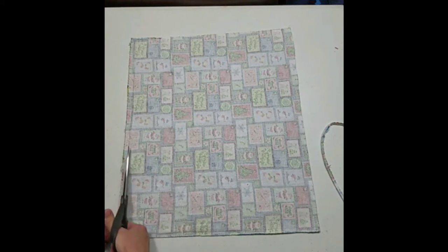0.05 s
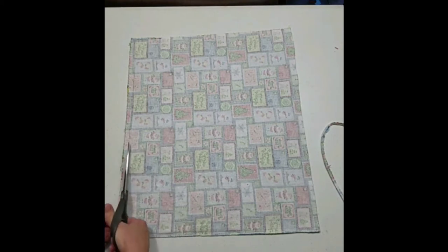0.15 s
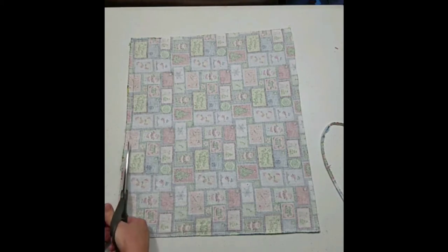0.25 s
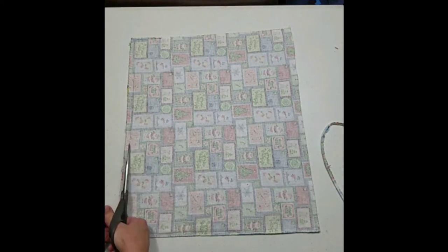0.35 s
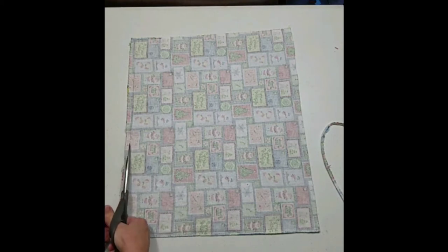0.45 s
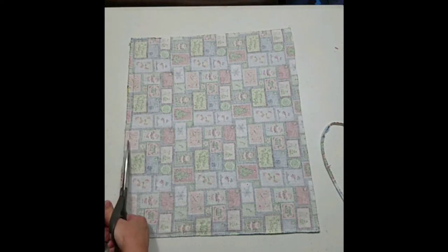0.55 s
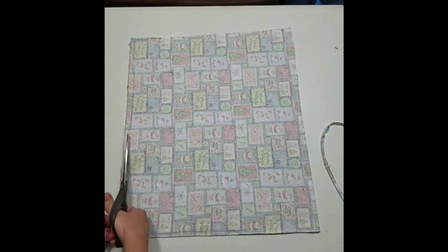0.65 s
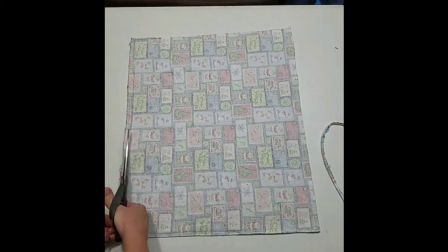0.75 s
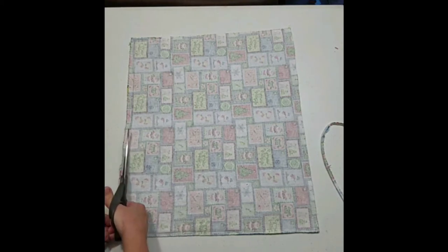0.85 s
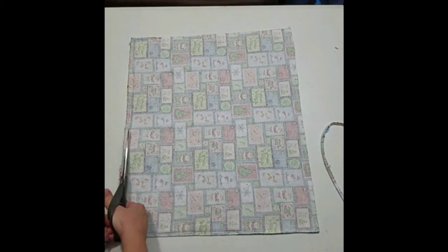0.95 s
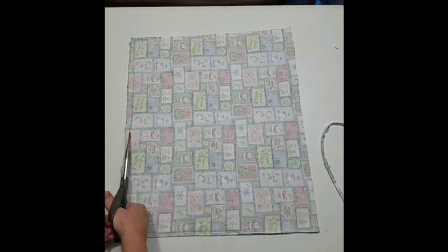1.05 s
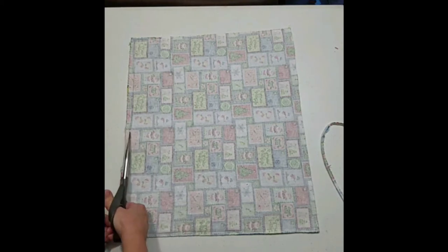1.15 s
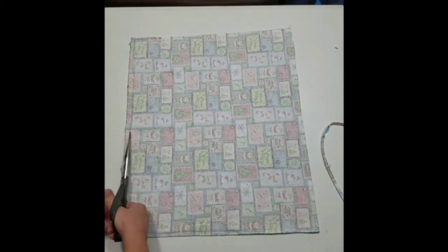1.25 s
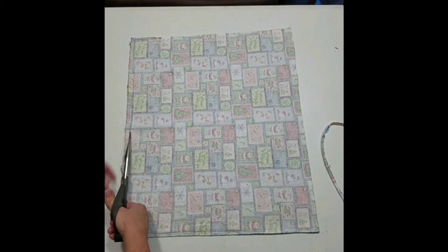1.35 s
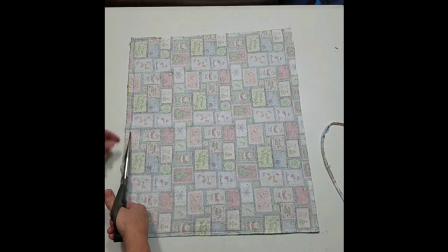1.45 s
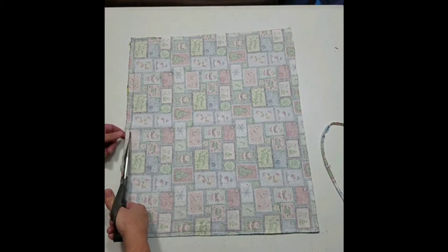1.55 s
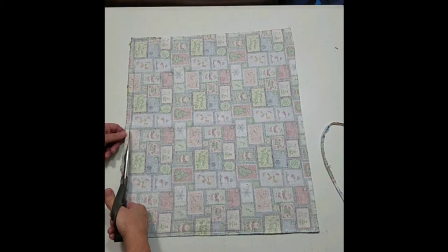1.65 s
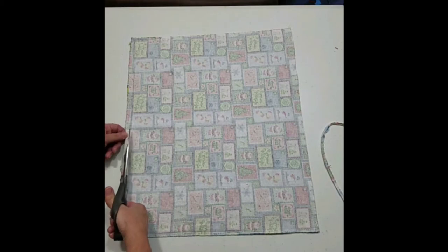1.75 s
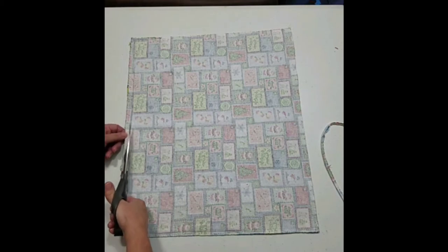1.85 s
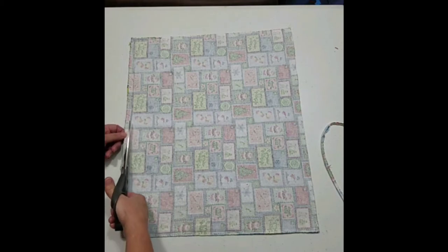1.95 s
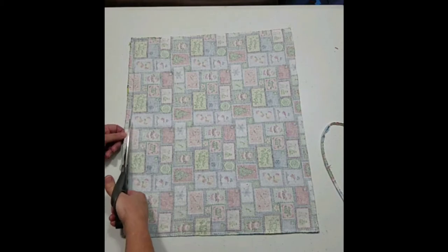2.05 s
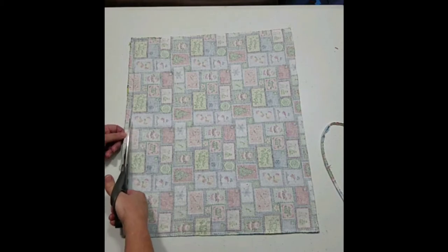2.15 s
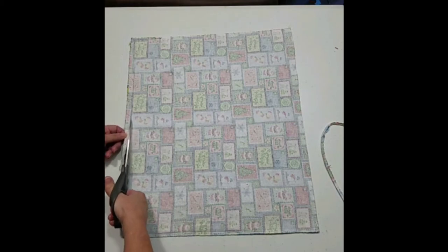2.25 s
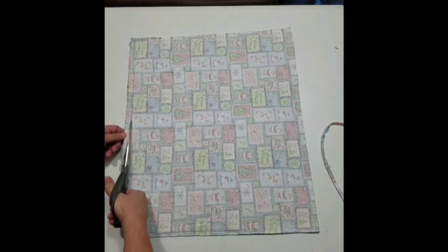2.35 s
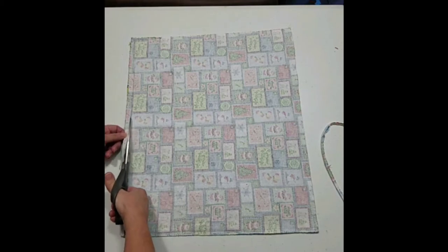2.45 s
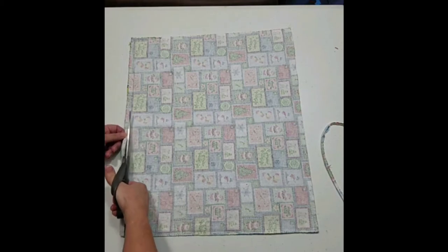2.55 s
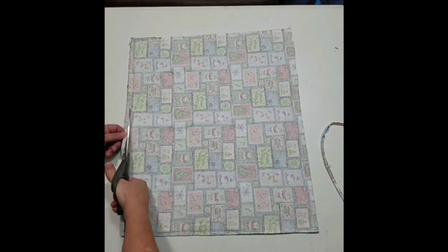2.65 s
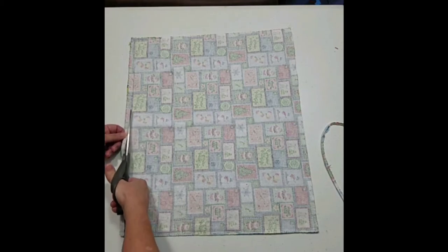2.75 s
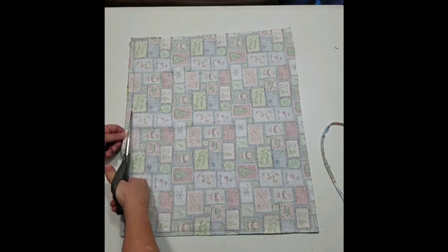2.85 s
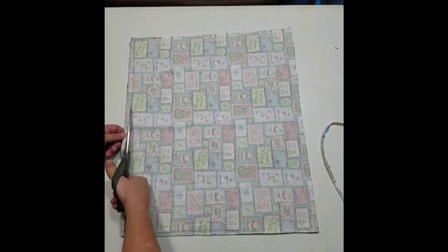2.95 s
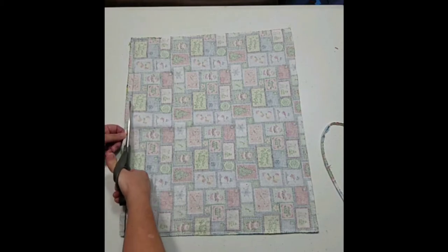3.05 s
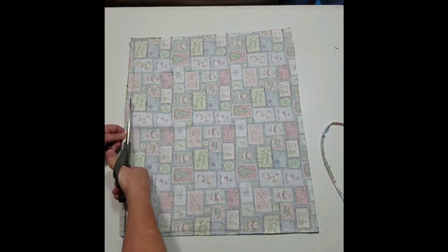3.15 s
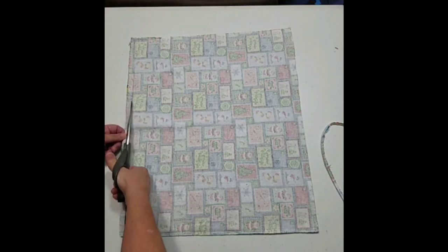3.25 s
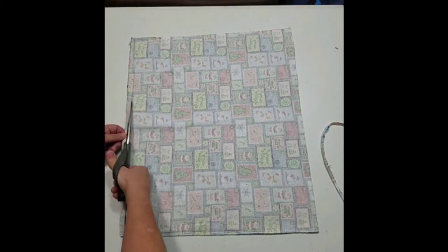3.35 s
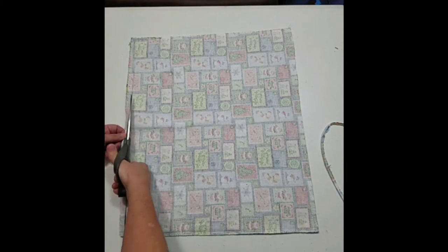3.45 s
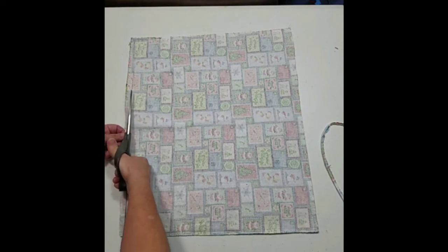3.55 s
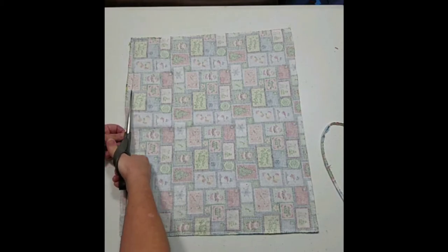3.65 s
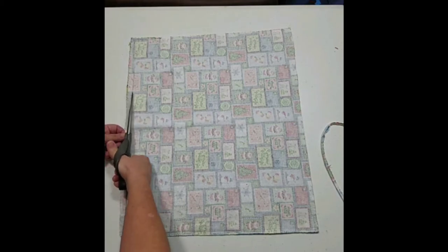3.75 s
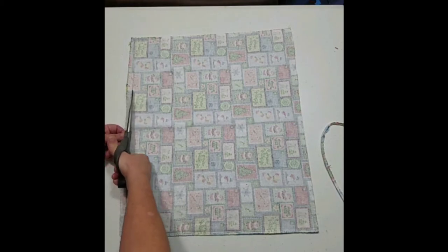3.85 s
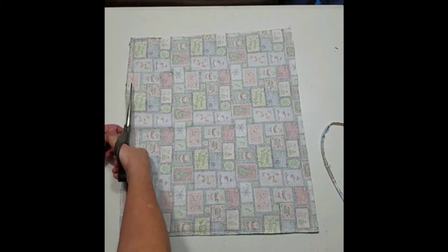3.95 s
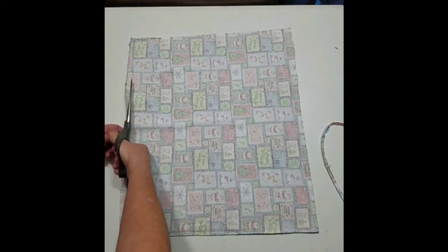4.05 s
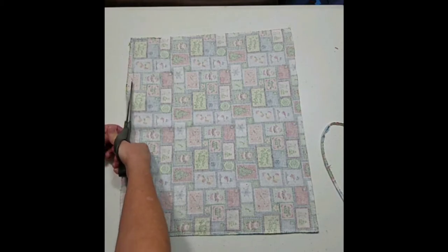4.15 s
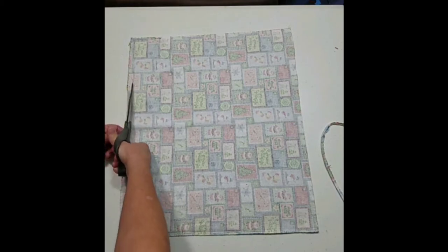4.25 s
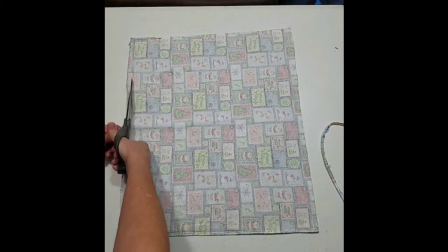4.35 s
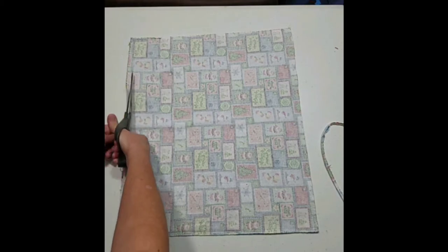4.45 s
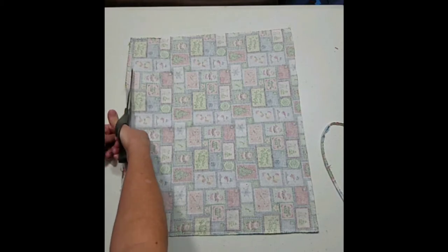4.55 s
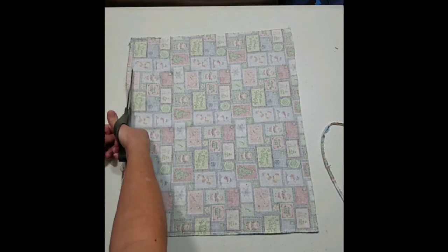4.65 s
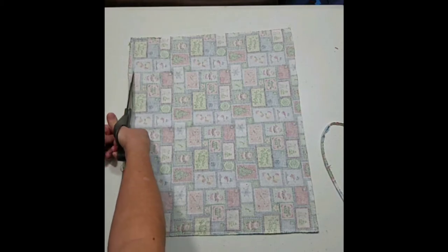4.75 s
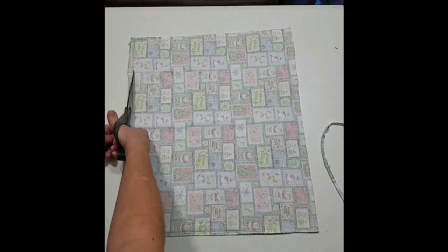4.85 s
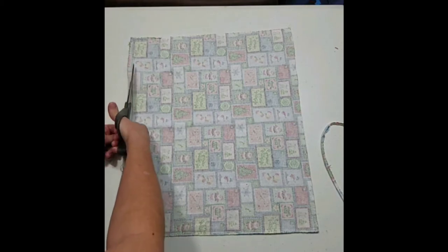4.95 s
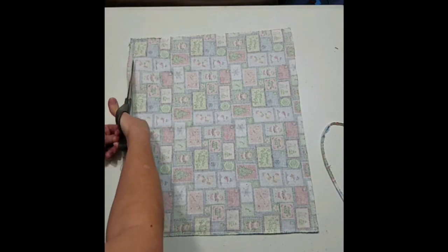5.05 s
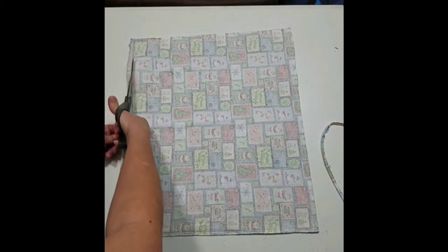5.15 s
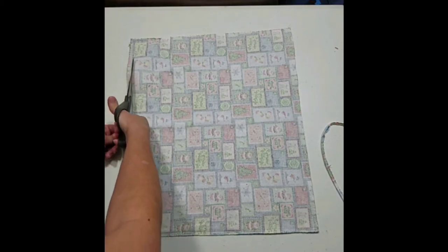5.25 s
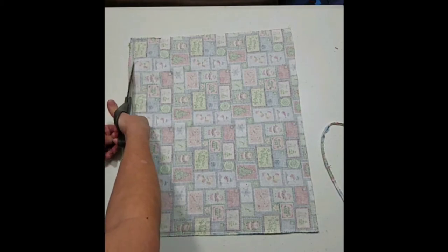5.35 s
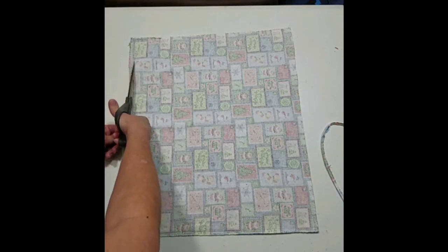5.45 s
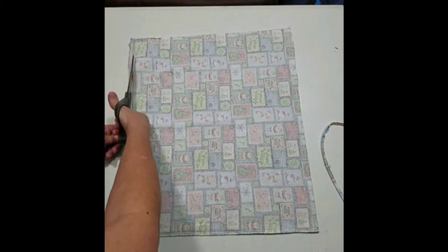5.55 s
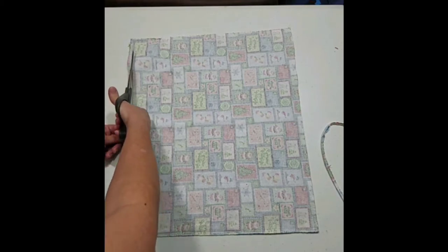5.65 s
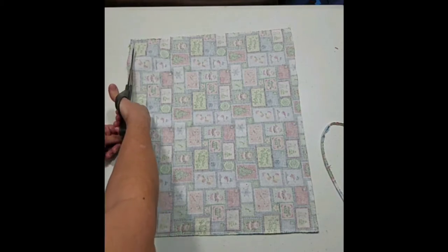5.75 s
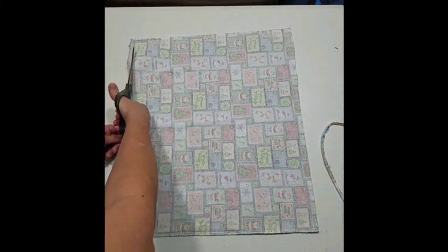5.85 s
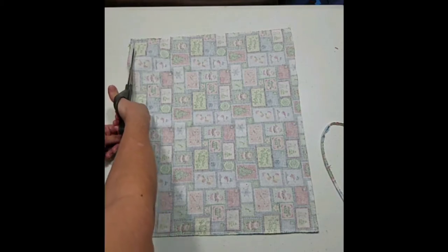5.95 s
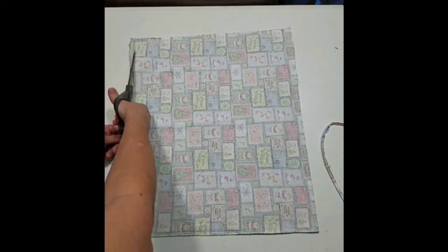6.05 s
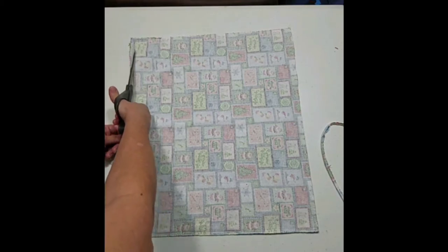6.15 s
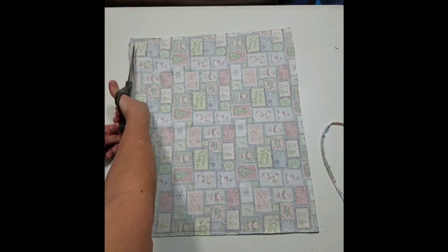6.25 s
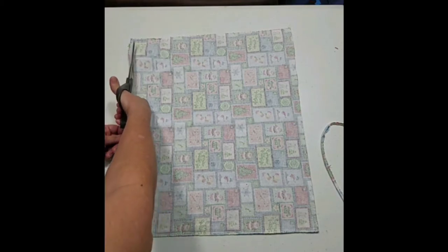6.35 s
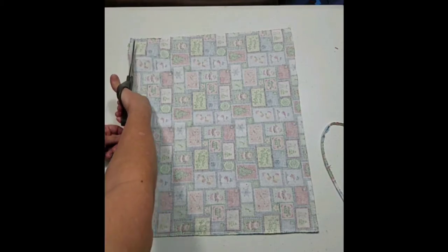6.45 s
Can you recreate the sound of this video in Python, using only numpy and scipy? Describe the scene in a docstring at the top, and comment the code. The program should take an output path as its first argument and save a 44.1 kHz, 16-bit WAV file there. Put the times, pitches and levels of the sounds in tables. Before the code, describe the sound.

In a small, quiet room, heavy fabric scissors work along cotton on a resonant table, heard close in stereo. Faint air and a light scrape with a soft rub open the scene. Crunchy cuts of about a tenth of a second start near 0.45 and 1.06 s, with a barely audible thin pivot squeak around 0.7-0.9 and a firm knock at 1.1. A pause holds only weak sliding until about 2.35, when a cut lands with the strongest knock. Cuts follow near 2.9, 3.3, 3.8, 4.3, 4.8, 5.4 and 6.1. Each is a grainy, bright hiss of snapping threads, its steel ring falling from pivot to tip, with woody drumming and low boom underneath. Between them the blades reopen and rub forward in soft swells. A dull knock comes near 6.2, then a last faint slide.

```python
"""In a small room, dressmaker's scissors make ten cuts along a piece of cotton lying on a table.
In each cut threads snap between the blades (crackling noise through spectra and gliding resonances),
whose ring drops as the crossing point runs from pivot to tip; the lower blade makes the table drum along.
Between cuts the scissors reopen and slide forward as swells of friction noise; knocks and legs are pulses.
A thin pivot squeak, a short room tail and faint steady air complete the scene."""
import sys
import numpy as np
from scipy import signal
from scipy.fft import rfft, irfft
from scipy.io import wavfile
from scipy.ndimage import uniform_filter1d

SR = 44100
rng = np.random.default_rng(int(sys.argv[2]) if len(sys.argv) > 2 else 0)


def wav_out(sig):
    """Save sig, one row per channel (or a flat mono array), as 16-bit PCM at SR to the path in sys.argv[1]."""
    wavfile.write(sys.argv[1], SR, np.round(np.clip(np.atleast_2d(sig).T, -1, 1) * 32767).astype(np.int16))


N = 286650
TAPS = 16384  # length of every body response, in samples
FILTER_HZ = np.fft.rfftfreq(TAPS, 1 / SR)

# Level columns in the event tables are relative: each layer adds its own trim.
# One row a cut: touch_s, wait_s until full grip, stroke_s, shear_db, drum_db, scrape_db, weight_db,
# light_db (touch against full grip), change_db over the stroke, bite_db and snap_db in the table, rock_db,
# pivot_hz, pivot_db and tip_hz, tip_db (blade ring against the shearing), spot_hz (table's ring at this spot)
STROKES = [(.441, 0.0055, 0.12, -52.5, -34, -42.5, -38.5, -3, -5.5, -29, -26.5, -47, 8600, 0.5, 4560, -2.5, 895),
           (1.061, 0.0411, .095, -49.5, -35, -38, -38.5, -4.5, -5.5, -23, -32, -38.5, 8370, -4, 4400, -10.5, 1150),
           (2.354, 0.024, 0.08, -49.5, -31.5, -37, -36, -2, 14, -38, -21, -35, 8700, -5, 4170, -10, 520),
           (2.860, 0.027, 0.081, -49.5, -36, -41.5, -34, -8, -4, -34.5, -32.5, -31, 7660, -9.5, 4300, -9, 524),
           (3.322, .012, 0.074, -51, -37.5, -39.5, -35.5, -9, 10, -31, -29, -31.5, 8140, 6, 4550, -4, 1065),
           (3.767, 0.03, 0.096, -50.5, -38, -40.5, -42, -8, -3, -31.5, -29, -44, 8170, -0.5, 4580, -4, 970),
           (4.262, 0.0053, 0.11, -51, -35.5, -44.5, -40.5, -6, 1, -47, -56, -33, 8000, 1, 4480, -4.5, 890),
           (4.786, 0.0046, 0.11, -49, -36, -42, -34.5, 2.5, 9, -56, -33, -35, 7920, 0.5, 4570, -5, 820),
           (5.395, 0.033, 0.099, -52, -38, -47.5, -36.5, -13.5, -12, -29, -24, -40, 8100, -12, 4500, -2, 626),
           (6.064, 0.032, 0.099, -52.5, -34.5, -44.5, -39, -5, -2.5, -29.5, -23, -38, 7780, -3.5, 4900, -2, 594)]
# The table top's resonances: pitch_hz, width_hz, height_db
TABLE_PEAKS = [(282.3, 73, 6.2), (318.5, 12.6, 2.4), (402.2, 17, 6.7), (533, 22, 1.8), (622, 110, 3.5),
               (770.5, 27, 8.2), (1073, 19, 10.2), (1370, 25, 3), (1310, 12, 1)]
# Spectrum of the table scraped by the lower blade: pitch_hz, density_db (per Hz)
SCRAPED_TABLE = [(250, -18), (500, -2), (750, 0), (1100, -3), (1500, -8), (2200, -15), (4000, -29),
                 (9000, -35), (15000, -42)]


def cutting(shear_db, drum_db, scrape_db, weight_db):
    """The same uneven force rings the blades and drums, scrapes and booms the table under them."""
    # spectrum of the drummed table: pitch_hz, density_db (per Hz)
    drummed_table = [(60, -12), (150, -22.5), (240, -6), (320, 0), (430, 1), (520, -7.5), (700, -11.5),
                     (1100, -20.5), (4000, -69)]
    bite_s, snap_s, snap_lead_s = 0.023, 0.012, 0.012  # the snap starts just before the tips meet
    bite_in_steel_db, snap_in_steel_db = -4, 3.5  # against the shearing
    steel_lag_s = 0.0018  # the first touch reaches the table before the blades
    touch_rise_db = 9  # the touch firms up on the way to the full grip
    release_s = 0.023  # the squeeze dies away as the tips meet

    t, cuts = np.arange(N) / SR, np.transpose(STROKES)
    # each sample reads its own cut's row, switching 0.1 s ahead of the touch
    current = np.searchsorted(cuts[0, 1:] - .1, t)
    touch, wait, stroke, shear, drum, scrape, weight, light, change, bite, snap, _, *rings, spot_hz = cuts[:, current]
    grip = touch + wait
    closed = grip + stroke
    travel = (t - grip) / stroke
    done = np.clip(travel, 0, 1)

    # a light first touch, then the full squeeze, strongest in mid-stroke before the cut's own tilt
    firm = step((t - grip) / .003)
    creep = amp(light + touch_rise_db * (np.clip((t - touch) / wait, 0, 1) - .5))
    gripped = creep * step((t - touch) / .003) * (1 - firm) + firm
    arch = .72 + .35 * np.sin(np.pi * done)
    squeeze = gripped * step((closed - t) / release_s) * arch * amp(change * (done - .5))
    # the hand's weight builds through the stroke and leaves the table after it
    lean = gripped * (1.65 + .5 * done) * np.exp(-np.maximum(t - closed, 0) / 0.01)

    # the blades bite into the cloth, and snap through the last threads
    biting = surge(t - grip, bite_s)
    snapping = surge(t - closed + snap_lead_s, snap_s)
    blade_bite = np.hypot(amp(bite_in_steel_db) * biting, amp(snap_in_steel_db) * snapping)
    table_bite = np.hypot(amp(bite) * biting, amp(snap) * snapping)
    threads = weave(threads_per_s=410, uneven=.35, depth=0.22) * lumps(depth_db=2.5, size=400)

    blade_start = step((t - touch) / steel_lag_s - 1)
    blade_force = amp(shear + shear_db) * blade_start * np.hypot(squeeze, blade_bite) * threads
    steel = ringing_on(blades(blade_force, travel, *rings))

    tugs = crackle(per_s=1200, spread_db=3.0, smooth=0.22) * threads
    drum_force = amp(drum_db) * np.hypot(amp(drum) * (squeeze + 0.031 * lean), table_bite)
    wood = through(tugs * drum_force, body(drummed_table, TABLE_PEAKS))

    rasp = crackle(per_s=1200, spread_db=-3.5, smooth=1.0) * threads
    rasp = rasp * amp(scrape_db) * np.hypot(amp(scrape) * squeeze, 0.077 * table_bite)
    grind = amp(-1.5) * through(rasp, body(SCRAPED_TABLE, TABLE_PEAKS))
    spot = amp(-4.5) * resonate(rasp, spot_hz, width=280)  # the table's ring under the blade
    return steel + wood + grind + spot + table_boom(tugs * amp(weight + weight_db) * lean)


def blades(force, travel, pivot_hz, pivot_db, tip_hz, tip_db):
    """Snapping threads hiss and ring the steel in spurts: high near the pivot, lower towards the tips."""
    # spectrum of the shearing hiss: pitch_hz, density_db (per Hz)
    shearing = [(600, 17.5), (1500, -29), (2200, 2.5), (3200, 0), (4500, 2), (5900, 0.5), (7500, 1.5),
                (10500, 2.5), (13000, 1.5), (14700, -2)]
    near_pivot = step((.42 - travel) / .25)
    near_tip = step((travel - .58) / .35)
    snaps = force * crackle(per_s=8000, spread_db=-4, smooth=0.5)
    # the hiss yields a little where the ring takes over
    hiss_force = snaps * (1 - .3 * near_pivot) * (1 - .35 * near_tip)
    hiss = shifting(through(hiss_force, body(shearing)), patchy_db=4)
    heel = snaps * near_pivot * amp(pivot_db - 3.5) * lumps(depth_db=4, size=350)
    tips = snaps * near_tip * amp(tip_db - 1.5) * lumps(depth_db=4, size=350)
    # each end rings at its pitch and at a fainter overtone
    heel_ring = resonate(heel, pivot_hz, width=1500) + amp(-10) * resonate(heel, 1.5 * pivot_hz, width=1400)
    tip_ring = resonate(tips, tip_hz, width=1300) + amp(-10) * resonate(tips, 1.9 * tip_hz, width=1400)
    return hiss + heel_ring + tip_ring


def ringing_on(steel):
    """The blades' own modes ring on briefly after the threads."""
    # the steel's modes: pitch_hz, width_hz, level_db
    steel_modes = [(4050, 17, 6), (4450, 36, 0), (4900, 89, -2), (7700, 37, 1.5), (7800, 80, -11),
                   (8500, 54, -7.5), (9100, 67, -8), (13600, 40, 16), (14434, 40, 14)]
    return steel + amp(-12.5) * through(steel, ring(steel_modes))


def weave(threads_per_s, uneven, depth):
    """The force pulses at a wandering rate as the edge meets one thread after another."""
    wander = evened(uniform_filter1d(rng.standard_normal(N), size=300))
    speed = threads_per_s * np.exp(uneven * wander)
    return evened(np.exp(depth * np.cos(2 * np.pi * np.cumsum(speed) / SR)))


def shifting(x, patchy_db):
    """The hiss has an uneven, shifting grain: random level patches over time and pitch."""
    z = signal.stft(x, nperseg=256)[2]
    patches = uniform_filter1d(rng.standard_normal(z.shape), size=5, axis=0)
    patches = evened(uniform_filter1d(patches, size=5, axis=1))
    return signal.istft(z * amp(patchy_db * patches), nperseg=256)[1][:N]


def surge(t, length_s):
    """A quick rise of force at t = 0 that lasts for a few threads."""
    t = np.maximum(t, 0)
    return (1 - np.exp(-t / .002)) * np.exp(-(t / length_s) ** 2)


def table_boom(drive):
    """The hand's weight stirs the low modes, which change in level as the scissors move up the table."""
    # the table's low modes: pitch_hz, width_hz, halfway_db, change_db_per_s
    low_modes = [(58.3, 12, -16, -1), (120.9, 15.5, -14, -3.5), (142.1, 19.8, -1, -1.2),
                 (168.6, 17.7, -1.5, 1.15), (228, 28.4, -11, 1.5)]
    from_halfway_s = (np.arange(N) - N / 2) / SR
    boom = np.zeros(N)
    for hz, width, db, change in low_modes:
        boom += through(drive * amp(db + change * from_halfway_s), ring([(hz, width, 0)]))
    return boom / np.linalg.norm([amp(db) for _, _, db, _ in low_modes])


def rocking(level_db):
    """The settling hand and the end of each stroke rock the table on its legs."""
    settle = (0, -35.5)  # start_s, level_db: the hand settles before the first cut
    rock_lead_s = 0.011  # the table starts to rock this long before the blades close
    touch, wait, stroke, rock_db = np.transpose(STROKES)[[0, 1, 2, 11]]
    return blows([settle, *zip(touch + wait + stroke - rock_lead_s, rock_db)], legs(), level_db)


def legs():
    """The table's leg mode swells and dies after a push."""
    mode_hz, swell_s = 60.1, 0.029
    t = np.arange(TAPS) / SR
    return t / swell_s * np.exp(1 - t / swell_s) * np.sin(2 * np.pi * mode_hz * t)


def sliding(rub_db, scrape_db, weight_db):
    """A short scrape as the pivot turns, then a swell as the lower blade rubs over the table."""
    # reopenings and slides: opens_s, pivot_db, middle_s, half_length_s, rubbing_db, weight_db
    advances = [(0.072, -51.5, .205, 0.067, -44, -55), (0.67, -49.5, .82, 0.057, -44, -54.5),
                (1.382, -77, 1.78, 0.053, -56, -77), (1.957, -64, 2.07, 0.056, -53, -57),
                (2.577, -54.5, 2.67, 0.033, -51, -54), (3.074, -52.5, 3.18, 0.045, -44.5, -52.5),
                (3.526, -54, 3.655, 0.052, -47, -53), (3.995, -52.5, 4.09, 0.045, -47, -54),
                (4.468, -53.5, 4.59, 0.06, -42.5, -47.5), (5.002, -52.5, 5.145, 0.052, -42, -50),
                (5.62, -57, 5.76, 0.067, -47, -52.5), (6.336, -55.5, 6.46, 0.095, -56, -64)]
    # spectrum of the rubbed table: pitch_hz, density_db (per Hz)
    rubbed_table = [(60, -22), (140, -12), (220, -1), (320, 0), (430, -6), (600, -16), (1100, -29),
                    (4000, -48), (15000, -58)]
    open_rise_s, open_fall_s = 0.012, 0.038  # the pivot's scrape swells and fades
    open_rub_db, open_weight_db = 5.5, -4.5  # table drive against pivot drive, before the layer trims
    slide_scrape_db = -13.5  # blade scrape against rubbing drive, before the layer trims
    weight_lag_s = 0.011  # the weight follows the slide

    t, power = np.arange(N) / SR, np.zeros((3, N))  # power of rubbing, scraping and weight
    for opens, pivot, middle, half, rubbing, pressing in advances:
        near = (t > opens - 10 * open_rise_s) & (t < middle + 5 * half)
        turn = amp(pivot) * swell(t[near] - opens, open_rise_s, open_fall_s)
        slide = amp(rubbing) * swell(t[near] - middle, half, half)
        press = amp(pressing) * swell(t[near] - middle - weight_lag_s, half, half)
        power[:, near] += np.square([amp(open_rub_db) * turn, turn, amp(open_weight_db) * turn])
        power[:, near] += np.square([slide, amp(slide_scrape_db) * slide, press])
    rub_force, scrape_force, weight_force = np.sqrt(power)

    slips = crackle(per_s=310, spread_db=0.5, smooth=0.86) * lumps(depth_db=4.5, size=900)
    grains = crackle(per_s=1400, spread_db=-1, smooth=0.96)
    rubs = amp(rub_db) * through(slips * rub_force, body(rubbed_table, TABLE_PEAKS))
    scrapes = amp(scrape_db) * through(grains * scrape_force, body(SCRAPED_TABLE, TABLE_PEAKS))
    return rubs + scrapes + amp(weight_db) * table_boom(slips * weight_force)


def swell(t, rise_s, fall_s):
    """A smooth hump with its top at t = 0."""
    return np.exp(-(t / np.where(t < 0, rise_s, fall_s)) ** 2 / 2)


def knocking(level_db):
    """The scissors knock on the table: single pushes into its resonant body."""
    # the knocks: start_s, level_db
    knocks = [(.511, -26), (.753, -30), (1.123, -14.5), (2.071, -33), (2.21, -63), (2.434, -10.5),
              (2.957, -35), (3.768, -29), (4.871, -25.5), (5.394, -31), (6.173, -20.5)]
    # spectrum of the knocked table: pitch_hz, density_db (per Hz)
    knocked_table = [(50, -13), (140, 10.5), (330, 1.5), (550, 1), (1100, -26), (2000, -29), (4500, -36),
                     (7000, -40), (15000, -46)]
    return blows(knocks, body(knocked_table, TABLE_PEAKS), level_db)


def squeak(width):
    """A thin, fuzzy whistle from the dry pivot: lumpy noise in a gliding resonance."""
    # breakpoints of the squeak: time_s, pitch_hz, level_db
    whistle = [(.67, 12200, -85), (.75, 13200, -85), (.82, 12700, -84), (.88, 12200, -91)]
    t, (s, hz, db) = np.arange(N) / SR, np.transpose(whistle)
    level = np.interp(t, s, amp(db), left=0, right=0)
    friction = rng.standard_normal(N) * lumps(depth_db=-6, size=600)
    return resonate(friction * level, np.interp(t, s, hz), width)


def phase_scattered(x, scatter):
    """A side signal for stereo width: the same sound with randomly scattered phases, so left and right differ."""
    z = signal.stft(x, nperseg=256)[2]
    turned = 1j * z * np.exp(1j * scatter * rng.standard_normal(z.shape))
    return np.std(x) * evened(signal.istft(turned, nperseg=256)[1][:N])


def room(x):
    """A diffuse noise tail whose treble dies first."""
    # decay of the room: pitch_hz, t60_s
    decay = [(100, .28), (500, .28), (4000, .22), (14000, .18)]
    hz, t, z = signal.stft(rng.standard_normal(SR // 2), SR, nperseg=256)
    fade = amp(-60 * t / read(decay, hz)[:, None]) * (t > .006)
    tail = signal.istft(z * fade, SR, nperseg=256)[1]
    return through(x, tail / np.linalg.norm(tail))


def room_tone():
    """Faint steady air and microphone hiss: noise through one fixed spectrum."""
    # spectrum of the quiet: pitch_hz, density_db (per Hz)
    quiet_air = [(15, -68), (25, -22.5), (63, -0.5), (92, -2.5), (161, 1.5), (297, -13.5), (443, -10),
                 (796, -19.5), (1290, -22.5), (1680, -21.5), (1820, -23), (2370, -26), (14500, -38)]
    return amp(-63) * through(rng.standard_normal(N), body(quiet_air))


def microphones(mid, side):
    """Two ports: alike in the bass, apart in the treble, each with its own colour."""
    # gain of the side signal: pitch_hz, gain_db
    side_gain = [(60, -12), (130, -23), (280, -18), (550, -8), (1000, -2), (2000, 0), (15000, 0)]
    # left minus right: pitch_hz, difference_db
    left_lean = [(30, -1), (60, -8), (130, 2), (600, 0.5), (1200, -1.5), (2500, -2), (5000, -0.5),
                 (8500, -6), (13000, 2.5)]
    hz = np.fft.rfftfreq(N, 1 / SR)
    mid, side = rfft(mid), rfft(side) * amp(read(side_gain, hz))
    lean = amp(read(left_lean, hz) / 2)
    return irfft(np.array([(mid + side) * lean, (mid - side) / lean]), N)


def amp(db):
    """Decibels to gain."""
    return 10 ** (np.asarray(db) / 20)


def evened(x):
    """Scales to unit rms."""
    return x / np.sqrt(np.mean(x ** 2) + 1e-20)


def step(x):
    """A soft switch from 0 to 1."""
    return .5 + .5 * np.tanh(x)


def read(points, hz):
    """Reads a curve on a log-frequency axis."""
    f, value = np.transpose(points)
    return np.interp(np.log(hz + 1), np.log(f + 1), value)


def crackle(per_s, spread_db, smooth):
    """Clicks of uneven size over smooth friction noise."""
    size = (rng.random(N) < per_s / SR) * amp(spread_db * np.minimum(rng.exponential(1, N), 3))
    clicks = evened(size * rng.choice([-1., 1.], N))
    return evened(clicks + smooth * rng.standard_normal(N))


def lumps(depth_db, size):
    """A force that catches and lets go at random."""
    return evened(amp(depth_db * evened(uniform_filter1d(rng.standard_normal(N), size=size))))


def body(spectrum, modes=()):
    """Causal response of unit energy: a broad spectrum with resonant peaks on it."""
    db = read(spectrum, FILTER_HZ)
    db = db + sum(h / (1 + (2 * (FILTER_HZ - f) / w) ** 2) for f, w, h in modes)
    # folding the cepstrum forward gives minimum phase
    cepstrum = irfft(np.log(amp(db)))
    cepstrum[1:TAPS // 2] *= 2
    cepstrum[TAPS // 2 + 1:] = 0
    response = irfft(np.exp(rfft(cepstrum)))
    return response / np.linalg.norm(response)


def ring(modes):
    """Response of unit energy made of damped modes that swell briefly and die."""
    t, response = np.arange(TAPS) / SR, np.zeros(TAPS)
    for f, w, db in modes:
        # the swell narrows a mode, so 1.5 times the damping about restores its width
        response += amp(db) * evened(t * np.exp(-np.pi * 1.5 * w * t) * np.sin(2 * np.pi * f * t))
    return response / np.linalg.norm(response)


def resonate(x, hz, width):
    """A steep resonance that follows the curve hz and keeps the power of white noise."""
    turn, r = np.exp(2j * np.pi * np.cumsum(hz) / SR), np.exp(-np.pi * width / SR)
    # shift the pitch down to zero, smooth with two equal poles, shift back up
    slow = signal.lfilter([(1 - r) ** 2], [1, -2 * r, r * r], x / turn + 1e-18)
    return 2 * (turn * slow).real / np.sqrt(np.pi * width / (2 * SR))


def through(drive, response):
    """Plays a drive through a response."""
    return signal.oaconvolve(drive, response)[:N]


def blows(rows, response, level_db):
    """Single pushes into a response."""
    pushes = np.zeros(N)
    for s, db in rows:
        pushes[max(round(s * SR), 0)] = -amp(db + level_db)
    return through(pushes, response)


def scene():
    """Cuts, slides and knocks on one table in a small room."""
    work = cutting(shear_db=2.5, drum_db=-2.5, scrape_db=-6.0, weight_db=-5.9)
    work = work + sliding(rub_db=-2.0, scrape_db=-11.0, weight_db=8.0)
    work = work + knocking(level_db=13.0) + rocking(level_db=-9.0) + squeak(width=260)
    wet = amp(-13)
    # mid and side get separate tails and separate air
    mid = work + wet * room(work) + room_tone()
    side = phase_scattered(work, scatter=1.24) + wet * room(work) + room_tone()
    return microphones(mid, side)


def record(dry):
    """The microphone's bass cut, then the recorder's band limit."""
    edge_hz = 14800
    thinned = signal.sosfilt(signal.butter(3, 42, "highpass", fs=SR, output="sos"), dry)
    band_limit = signal.firwin(511, edge_hz, window=("kaiser", 9), fs=SR)
    return signal.oaconvolve(thinned, band_limit[None], "same")


dry = scene()
out = record(dry)
wav_out(out)
```